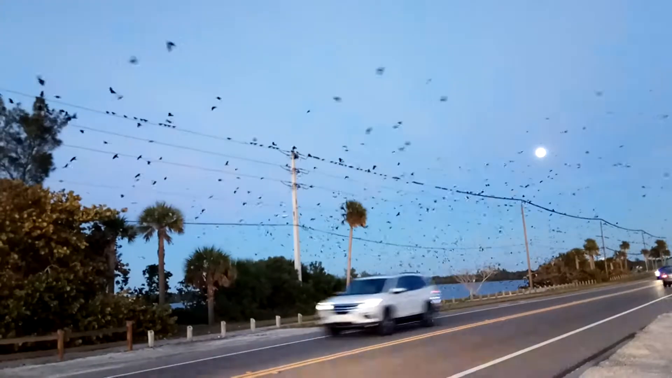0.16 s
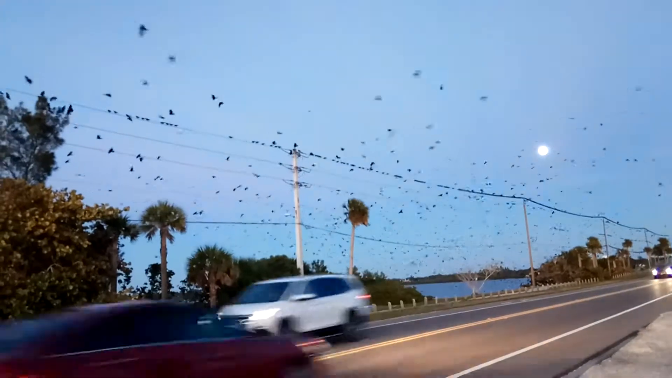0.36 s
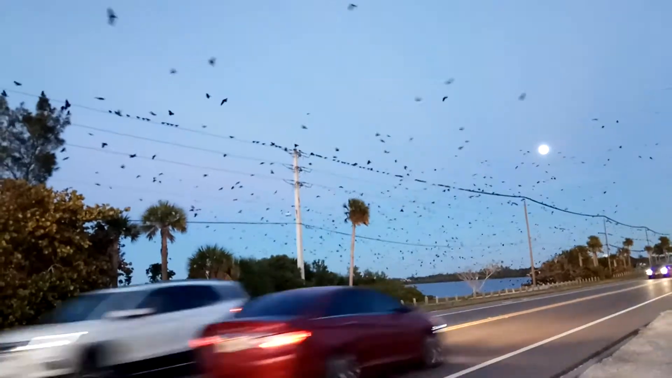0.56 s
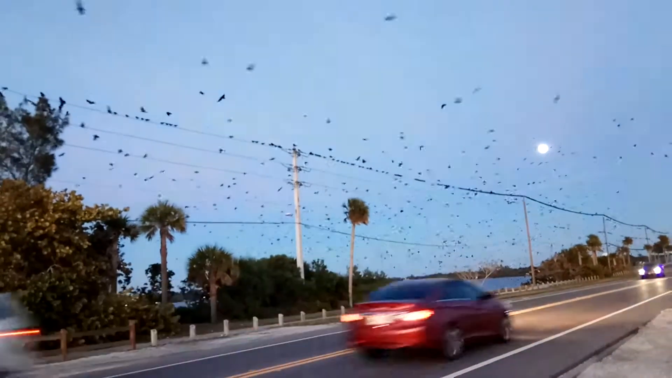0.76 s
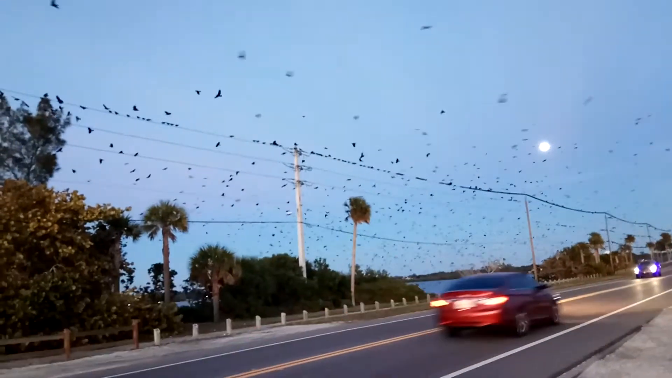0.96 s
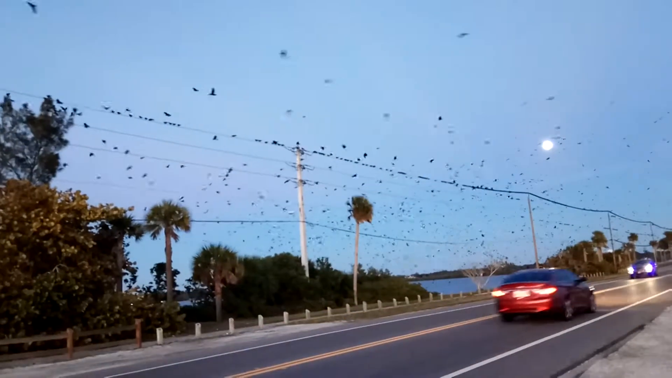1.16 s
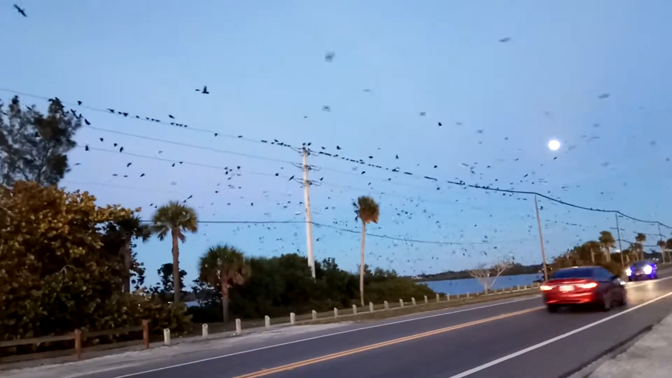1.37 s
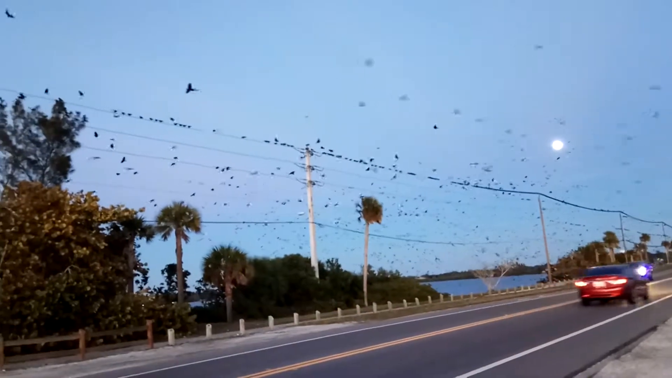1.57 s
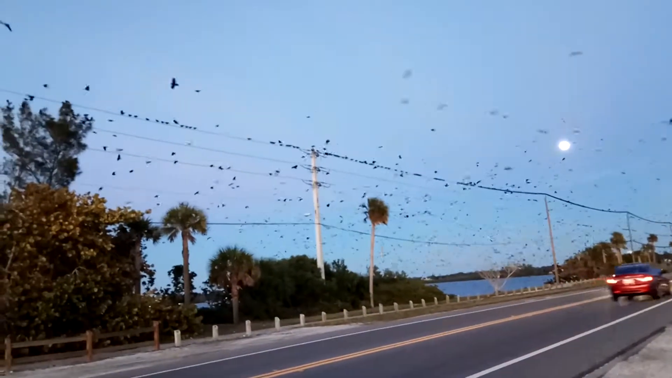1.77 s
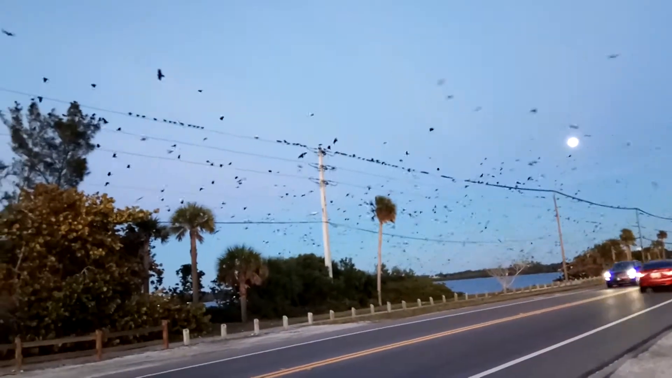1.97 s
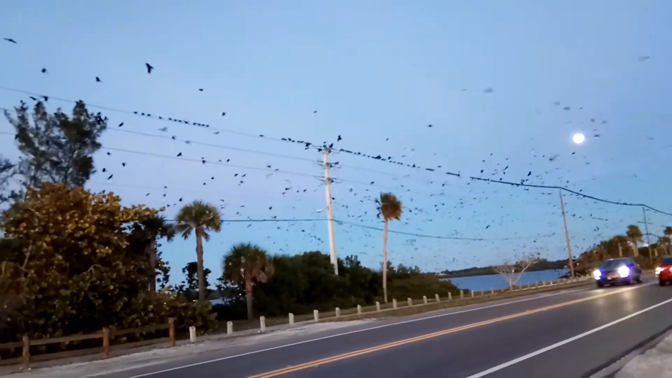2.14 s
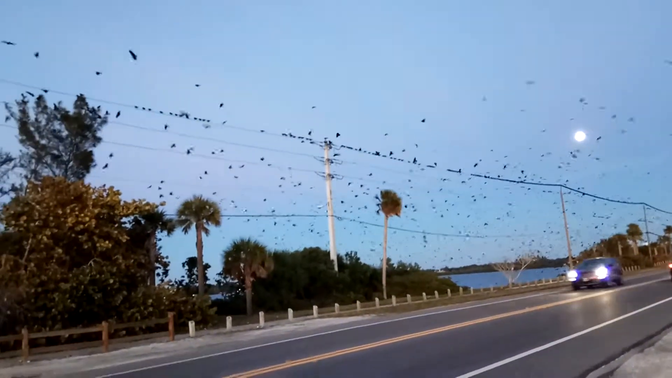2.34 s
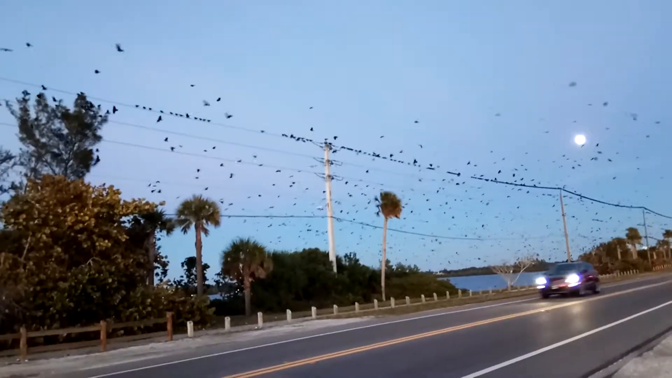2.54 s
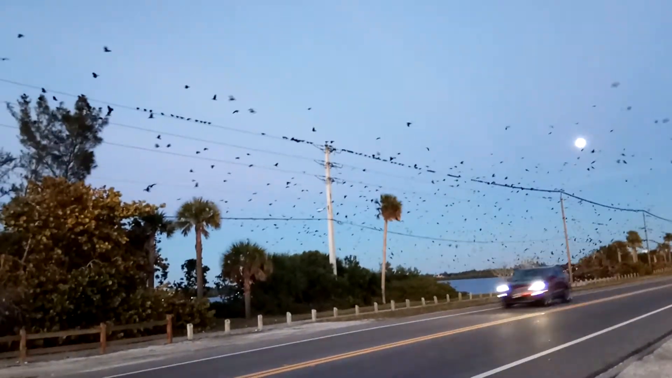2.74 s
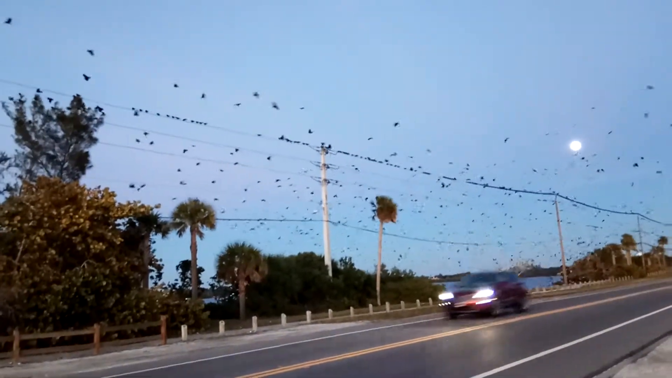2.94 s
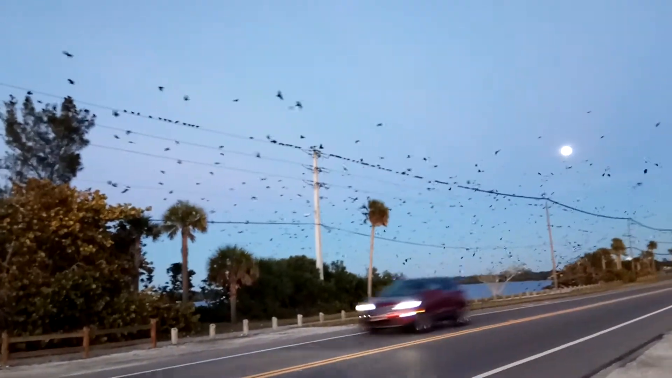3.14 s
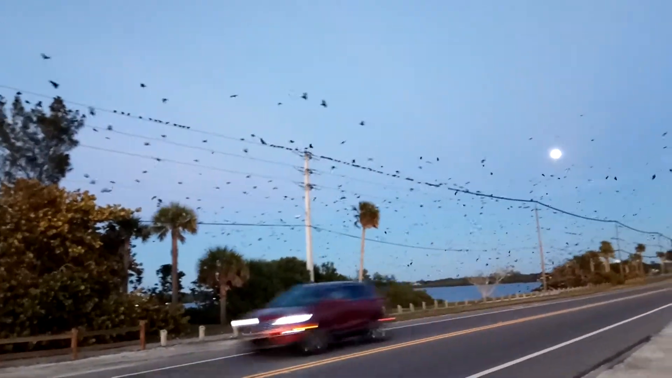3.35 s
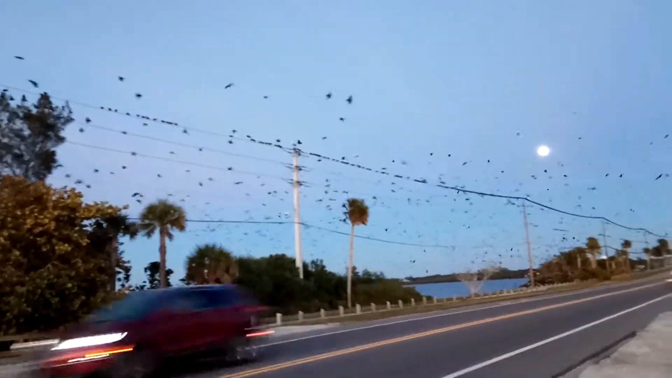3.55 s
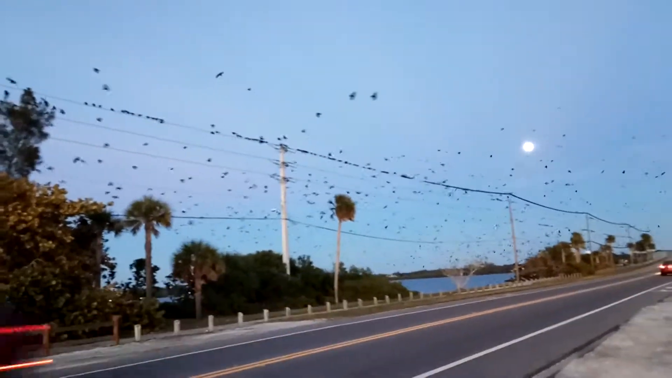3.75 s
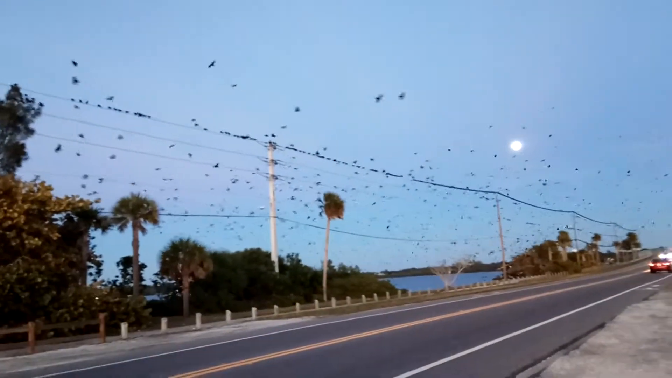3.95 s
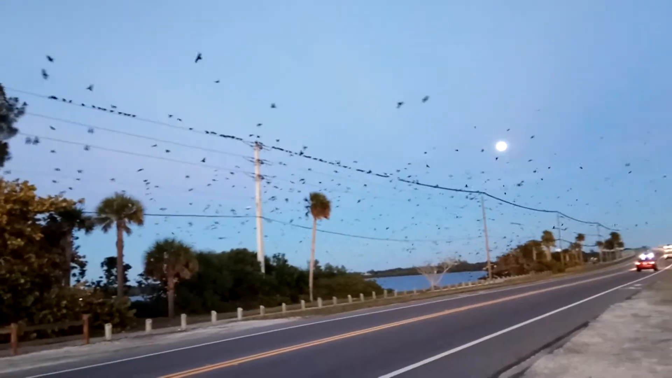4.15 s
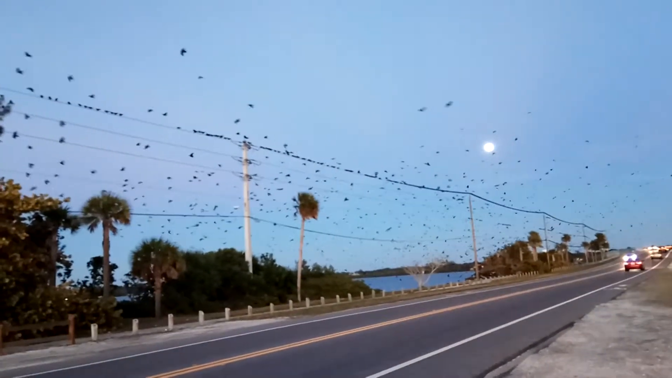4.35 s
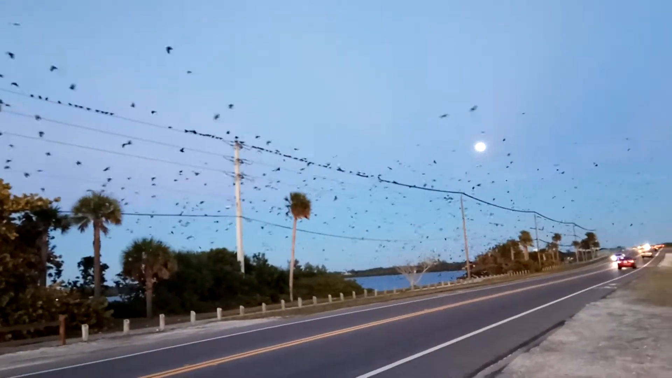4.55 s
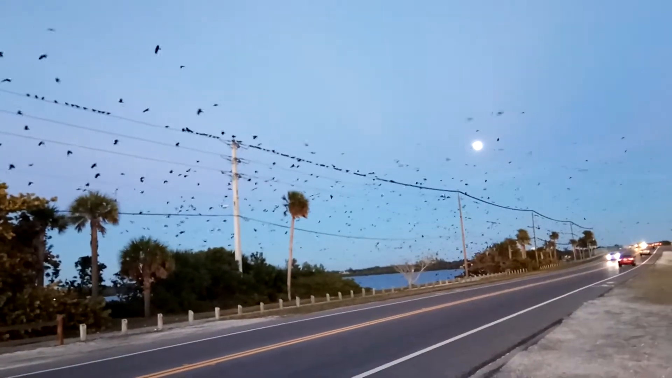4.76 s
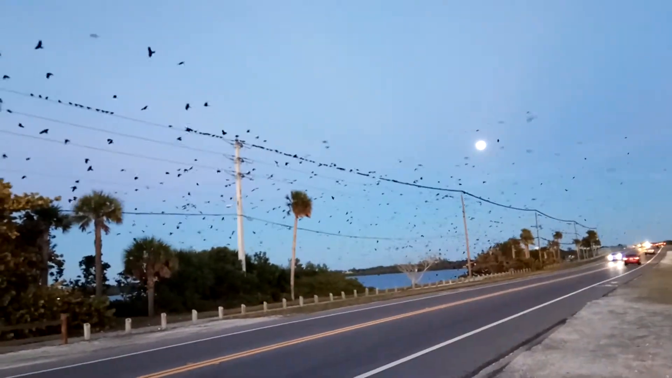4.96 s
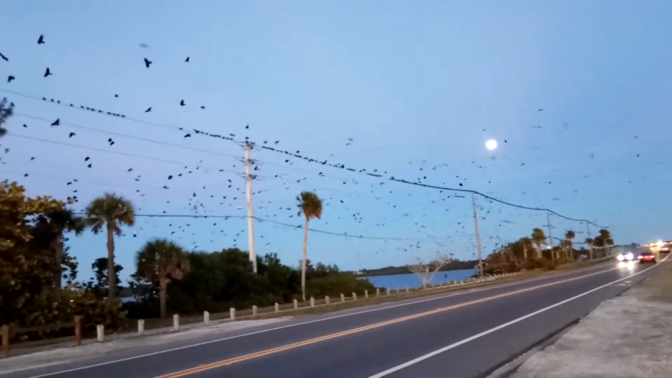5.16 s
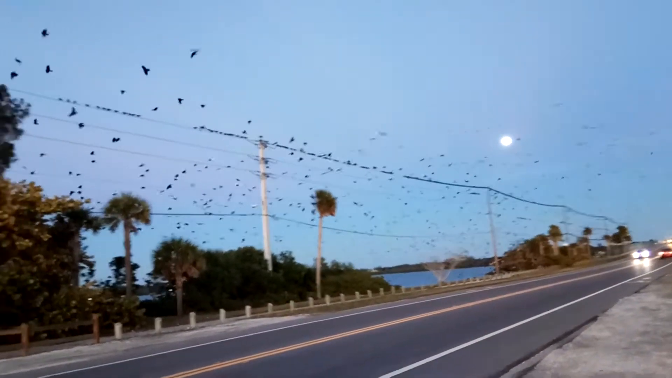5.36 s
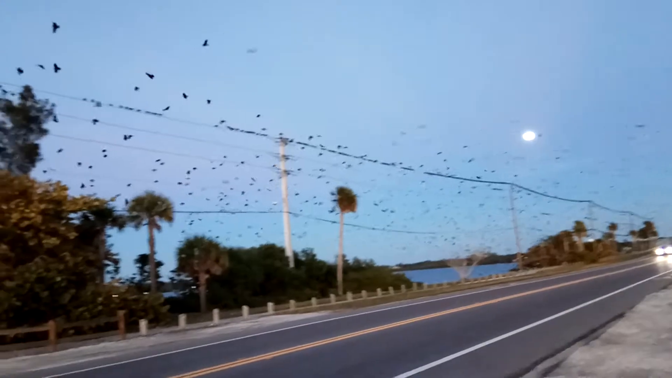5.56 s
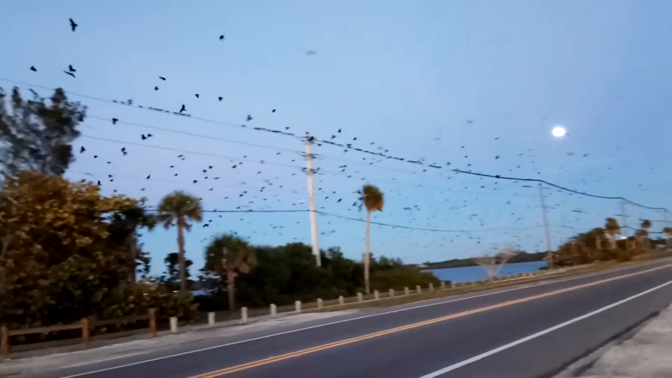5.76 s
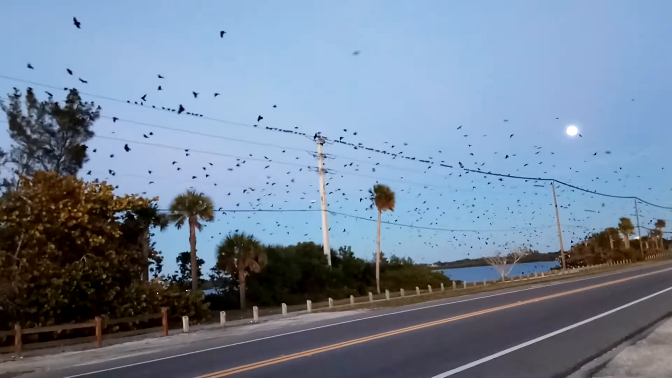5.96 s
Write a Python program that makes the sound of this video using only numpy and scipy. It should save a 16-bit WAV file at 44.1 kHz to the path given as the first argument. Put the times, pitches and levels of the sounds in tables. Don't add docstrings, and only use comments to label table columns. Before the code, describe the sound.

Broad tyre noise, roaring in the middle and hissing on top, rises at once as cars pass in opposite directions. Irregular low wind bumps hit each side separately, with sharp pops and overloaded thuds on the right around one, two and just under three seconds. Another car sweeps by near 3.7 seconds and fades away, leaving soft road wash and occasional muffled gusts in the open air.

```python
import sys
import numpy as np
from scipy import signal
from scipy.fft import rfft, irfft, next_fast_len
from scipy.io import wavfile
from scipy.ndimage import uniform_filter1d, map_coordinates

SR = 44100
rng = np.random.default_rng(int(sys.argv[2]) if len(sys.argv) > 2 else 0)


def elevation(decibels):
    levels = np.asarray(decibels, float)
    return 10 ** (levels / 20)


def materialize(psi):
    bounded = np.clip(np.atleast_2d(psi).T, -1, 1)
    quanta = np.round(bounded * 32767).astype(np.int16)
    wavfile.write(sys.argv[1], SR, quanta)


N = 265129
TIME = np.arange(N) / SR


def unit(x):
    return x / np.sqrt(np.mean(x ** 2, axis=-1, keepdims=True) + 1e-20)


def curves(rows):
    s, *columns = np.transpose(rows)
    return [np.interp(TIME, s, column) for column in columns]


def wobble(rate_hz):
    knots = rng.standard_normal(int(N * rate_hz / SR) + 4)
    return map_coordinates(knots, [TIME * rate_hz])


def coloured(x, spectrum):
    size = next_fast_len(N + 8192)
    f_hz, db = np.transpose(spectrum)
    hz = np.fft.rfftfreq(size, 1 / SR) + 1
    gain = elevation(np.interp(np.log(hz), np.log(f_hz), db, left=-120, right=-120))
    return unit(irfft(rfft(x, size) * gain, size)[:N])


def patchy(patchy_db):
    z = signal.stft(rng.standard_normal(N + 512), nperseg=512)[2]
    field = uniform_filter1d(rng.standard_normal(z.shape), size=6, axis=0)
    field = uniform_filter1d(field, size=8, axis=1)
    gain = elevation(patchy_db * field / field.std())
    return unit(signal.istft(z * gain, nperseg=512)[1][:N])


def late(x, ms):
    return map_coordinates(x, [np.arange(N) - ms * SR / 1000], order=3, mode="mirror")


# f/Hz, density/dB per Hz
SELF_NOISE_SPECTRUM = [(14600, -30), (14850, 0), (15050, 0), (15300, -20)]


def self_noise():
    floor = [coloured(rng.standard_normal(N), SELF_NOISE_SPECTRUM) for port in range(2)]
    return elevation(-74) * np.array(floor)


def evened(x, span_ms):
    swell = np.sqrt(np.abs(uniform_filter1d(x ** 2, round(span_ms * SR / 1000))) + 0.05)
    return unit(x / swell ** 0.47)


# f/Hz, density/dB per Hz
RUMBLE_SPECTRUM = [(15, -42), (30, -18), (60, -3.5), (100, 2.5), (170, -3), (280, -14), (500, -42.5),
                   (1200, -50)]
# f/Hz, density/dB per Hz
FLUTTER_SPECTRUM = [(120, -33), (250, 6.5), (400, 3), (700, -11.5), (1500, -20.5), (3000, -58)]


def buffet(breeze_db, gusts):
    rumble_power = elevation(breeze_db + 3.34 * wobble(14)) ** 2
    flutter_power = elevation(breeze_db - 45) ** 2
    for s, peak_db, width_ms, flutter_db in gusts:
        near = slice(max(round((s - 0.15) * SR), 0), round((s + 0.15) * SR))
        hump = np.exp(-((TIME[near] - s) / (0.0006 * width_ms)) ** 4)
        rumble_power[near] += elevation(peak_db - 5.0) ** 2 * hump
        flutter_power[near] += elevation(peak_db + flutter_db - 7.0) ** 2 * hump
    rumble = evened(coloured(rng.standard_normal(N), RUMBLE_SPECTRUM), span_ms=24.7)
    flutter = unit(coloured(rng.standard_normal(N), FLUTTER_SPECTRUM) * elevation(4 * wobble(90)))
    return np.sqrt(rumble_power) * rumble + np.sqrt(flutter_power) * flutter


# t/s, peak level/dB, f/Hz
EDDY_POPS = [(.860, -7, 400), (.880, -8, 550), (.890, -10, 650), (.945, -8, 300), (1.009, 0, 1000),
             (1.045, -10, 600), (1.073, -7, 500), (1.088, -10, 450), (1.204, -9, 400), (2.081, -5, 750),
             (2.744, -9, 500), (2.750, -7, 450), (2.7687, 2, 900)]


def pops():
    out = np.zeros(N)
    for s, peak_db, hz in EDDY_POPS:
        cycles = (TIME - s) * hz
        push = np.exp(-(4 * cycles) ** 2)
        rebound = 0.65 * np.exp(-(1.6 * (cycles - 0.7)) ** 2)
        out += elevation(peak_db) * (push - rebound)
    return out


# t/s, left level/dB, right level/dB
BREEZE_LEVELS = [(0, -34, -29), (.5, -33, -22.5), (.75, -32, -23.5), (1.1, -25.5, -25), (1.5, -32, -19),
                 (1.8, -31.5, -25.5), (2.2, -35, -24.5), (2.7, -31.5, -16.5), (3.2, -26, -17.5),
                 (3.5, -32, -27.5), (4.0, -31, -24.5), (4.4, -31.5, -33), (5.0, -34, -32.5),
                 (5.4, -40.5, -35), (5.75, -35, -26), (6.02, -28.5, -25)]
# t/s, peak level/dB, width/ms, flutter over rumble/dB
LEFT_GUSTS = [(.496, -14.5, 39, -16), (.668, -22, 22, -13), (.943, -19, 29, 1), (1.062, -13, 14, 0),
              (1.151, -7.5, 29, -12), (1.253, -16, 46, -11), (1.435, -22, 31, -11), (1.627, -15, 48, -13),
              (2.039, -17, 16, -24), (2.249, -18, 61, -13), (2.591, -10.5, 37, -4.5),
              (2.65, -12.5, 37, -12), (2.868, -19.5, 27, -0.5), (2.917, -12, 59, -2.5),
              (3.264, -14, 21, -14), (3.373, -20, 30, -23), (3.738, -28, 77, -22), (3.866, -15.5, 39, -18),
              (4.162, -18.5, 74, -9), (4.281, -25, 27, -8), (4.564, -24.5, 43, 2.5), (4.889, -23, 78, -6),
              (5.725, -20, 47, -20)]
# t/s, peak level/dB, width/ms, flutter over rumble/dB
RIGHT_GUSTS = [(.302, -14, 45, -30), (.678, -16, 38, -19), (0.863, -5.5, 72, -2), (0.947, -1, 23, -7),
               (0.998, -5, 13, -7), (1.06, -3, 52, -3), (1.164, -7, 21.4, -2), (1.213, -0.5, 21, -8),
               (1.363, -15, 52, -26), (1.468, -11, 15, -23), (1.559, -9, 19, -30), (1.894, -15, 34, -29),
               (2.061, -7.5, 54, -10.5), (2.121, -5.5, 19, -6), (2.198, -9, 52, -31), (2.403, -8, 10, -28),
               (2.465, -6, 14, -29), (2.532, -2.5, 20, -20), (2.701, -7.5, 15, -12), (2.774, -19.5, 67, -1),
               (2.832, -6, 18, -6), (2.912, -8, 17, -25), (3.053, -9.5, 8.9, -23), (3.125, -4, 11, -21),
               (3.509, -17, 80, -27), (4.749, -15.5, 42, -8), (4.892, -10.5, 22, -29),
               (5.035, -20.5, 61, -30), (5.544, -22.5, 34, -18), (5.735, -15, 57, -19)]


def wind():
    left_db, right_db = curves(BREEZE_LEVELS)
    left = buffet(left_db, LEFT_GUSTS)
    right = buffet(right_db, RIGHT_GUSTS) + pops()
    return np.array([left, right])


# t/s, depth/dB (negative: a slight lift), recovery/s
GAIN_DUCKS = [(.47, 5, 0.048), (.83, 4, 0.64), (1.1, -1.5, .1), (1.22, 1, 0.057), (1.54, 5, 0.021),
              (2.053, 9, 0.098), (2.74, 6.5, 0.059), (2.77, 8, 0.1), (3.17, 4, 0.052), (3.24, 3, 0.026),
              (3.85, 1, 0.034), (4.7, -0.5, .05)]


def ducking():
    grab_s = 0.0041
    gain_db = np.zeros(N)
    for s, depth_db, recovery_s in GAIN_DUCKS:
        since_s = np.maximum(TIME - s, 0)
        gain_db -= depth_db * (1 - np.exp(-since_s / grab_s)) * np.exp(-since_s / recovery_s)
    return gain_db


# bearing/degrees, left lag/ms, left echo delay/ms, right echo delay/ms, right hiss over left/dB
BODY_BY_BEARING = [(-89.5, -0.29, 0.19, 0.38, -5.3), (-51.5, -0.096, .28, 0.45, 1.5),
                   (-19.5, 0.013, 0.33, .37, 1), (7, 0.179, 0.38, 0.32, 3), (23.5, 0.31, 0.42, 0.22, 4.5),
                   (47, .46, 0.41, 0.2, 7), (65.5, .41, 0.26, 0.24, 2), (87, 0.34, 0.22, .2, 3)]


def path(abreast_s, lane_s, strength_db):
    spread = 0.94
    along = (TIME - abreast_s) / lane_s
    bearing = np.degrees(np.arctan(along))
    level_db = strength_db - 10 * spread * np.log10(1 + along ** 2)
    notch_hz = 9000 - 44 * bearing
    degrees, *columns = np.transpose(BODY_BY_BEARING)
    return [level_db, notch_hz] + [np.interp(bearing, degrees, column) for column in columns]


BODY_ECHO = [
    [.7 * np.exp(-.05j)],
    [.98 * np.exp(-1.25j)],
]


def car(share_db, notch_hz, lag_ms, left_ms, right_ms, tilt_db):
    tread = patchy(patchy_db=1.37)
    size = next_fast_len(N)
    hz = np.fft.rfftfreq(size, 1 / SR) + 1
    band = 1 / (1 + (650 / hz) ** 4) / (1 + (hz / 7000) ** 4)
    dull = irfft(rfft(tread, size) * band * BODY_ECHO, size)[:, :N]
    half_lag_ms = lag_ms / 2
    plain = np.array([late(tread, half_lag_ms), late(tread, -half_lag_ms)])
    bounce = np.array([late(dull[0], half_lag_ms + left_ms), late(dull[1], right_ms - half_lag_ms)])
    treble = signal.filtfilt(*signal.butter(2, 4500, "highpass", fs=SR), tread)
    bounce[0] -= 0.45 * late(treble, half_lag_ms + 500 / notch_hz)
    power = elevation(share_db) ** 2
    return elevation(share_db) * (plain - bounce), power, power * tilt_db


# t/s, roar level/dB, hiss over roar/dB
ROAD_LEVELS = [(0, -22, -11.5), (.15, -18.5, -13), (.45, -20.5, -11.5), (.65, -21, -9), (.95, -22.5, -9),
               (1.3, -21.5, -13.5), (1.75, -23.5, -13), (2.0, -27, -11.5), (2.38, -24, -14),
               (2.7, -27, -11), (3.0, -24.5, -12.5), (3.35, -21.5, -13), (3.65, -21.5, -9),
               (4.0, -22.5, -11), (4.25, -23.5, -13.5), (4.5, -27, -14), (5.2, -29.5, -13),
               (6.02, -32.5, -15)]
# f/Hz, density/dB per Hz
ROAR_SPECTRA = [
    [(120, -6.5), (300, -10.5), (700, -4.5), (930, -0.5), (1150, -4.5), (1800, -5.5), (2300, -13.5),
     (2900, -32), (4000, -74)],
    [(120, -6), (300, -4.5), (700, -1.5), (930, 4.5), (1150, 0), (1800, -3), (2300, -10.5), (2900, -16.5),
     (4000, -20)],
]
# f/Hz, density/dB per Hz
HISS_SPECTRA = [
    [(1800, -16), (2600, 4.5), (4300, 5.5), (5500, 0.5), (7000, -5.5), (8500, -6.5), (10500, -9),
     (14200, -31), (14900, -8.5), (15600, -24)],
    [(1800, -71), (2600, -4.5), (4300, 2), (5500, 0.5), (6600, 6), (7500, -3), (8500, -16.5), (10000, -47),
     (14200, -72), (14900, -20), (15600, -35)],
]
# t abreast/s, time to travel lane distance/s (negative: drives away ahead), level/dB
PASSING_CARS = [
    (0.676, 0.6, -0.086),
    (0.409, -0.35, 0.11),
    (3.7, 0.53, 0.19),
]


def traffic():
    roar_db, bright_db = curves(ROAD_LEVELS)
    duck_db = ducking()
    cars = [car(*path(*row)) for row in PASSING_CARS]
    direct, power, tilt = map(sum, zip(*cars))
    direct = direct / np.sqrt(power)
    hiss_db = [bright_db, bright_db + tilt / power]
    texture_db = 0.18 * wobble(9) + 0.63 * wobble(18)
    air_band = signal.butter(2, 10300, "highpass", fs=SR)
    out = []
    for port in range(2):
        roar = coloured(direct[port] + 0.49 * patchy(patchy_db=0.9), ROAR_SPECTRA[port])
        hiss = coloured(direct[port] + 1.26 * patchy(patchy_db=3.0), HISS_SPECTRA[port])
        air_db = 1.36 * (roar_db + hiss_db[port] + 35.5)
        hiss = hiss + (elevation(air_db) - 1) * signal.filtfilt(*air_band, hiss)
        hiss_gain = elevation(hiss_db[port] - 3.27 + 0.26 * wobble(14))
        tyres = elevation(1.43) * roar + hiss_gain * hiss
        out.append(elevation(roar_db + duck_db + texture_db) * tyres)
    return np.array(out)


def scene():
    return self_noise() + wind() + traffic()


def low_pass(x):
    return signal.sosfilt(signal.butter(12, 15600, fs=SR, output="sos"), x)


def record(dry):
    loudness = np.sqrt(np.abs(uniform_filter1d(np.max(dry ** 2, axis=0), size=1500)))
    held = dry / np.maximum(loudness / elevation(-14.5), 1) ** 0.5
    soft = held / (1 + np.abs(held / 0.95) ** 6) ** (1 / 6)
    return low_pass(soft)


dry = scene()
out = record(dry)
materialize(out)
```